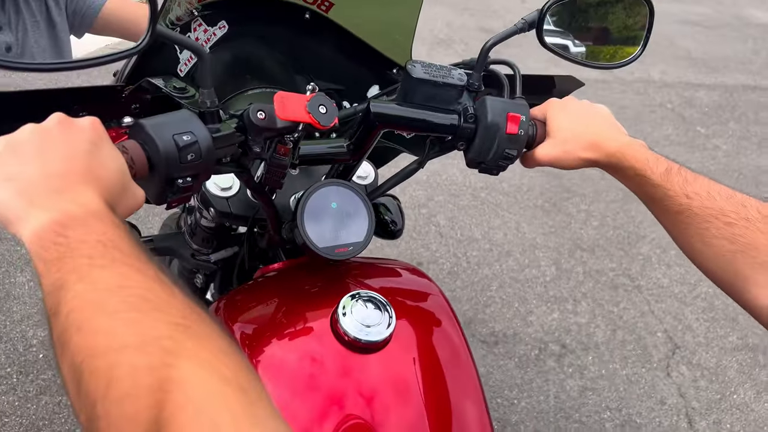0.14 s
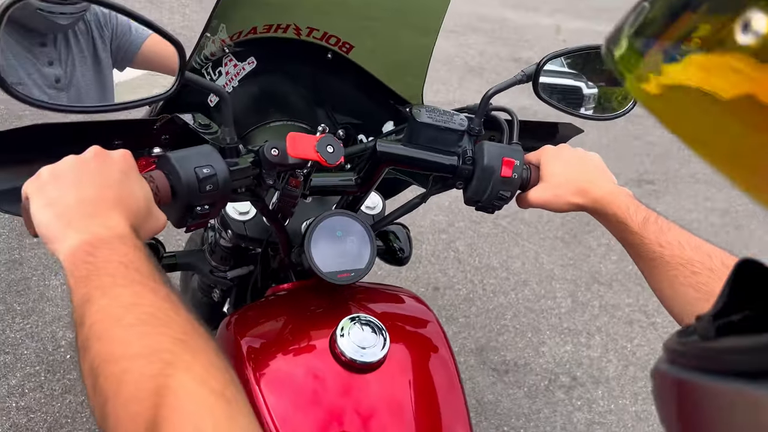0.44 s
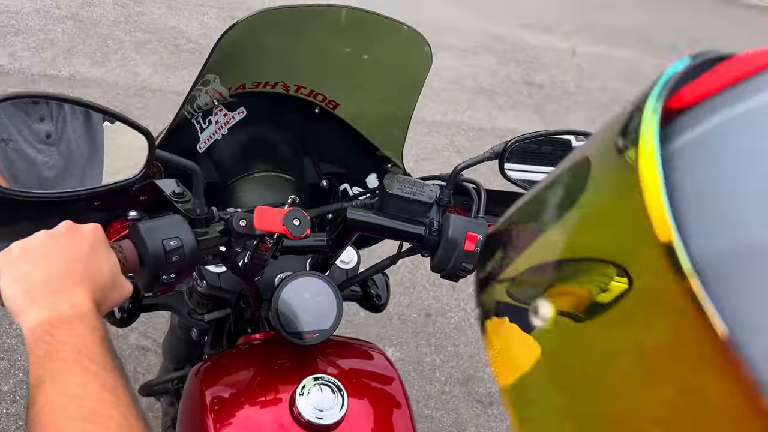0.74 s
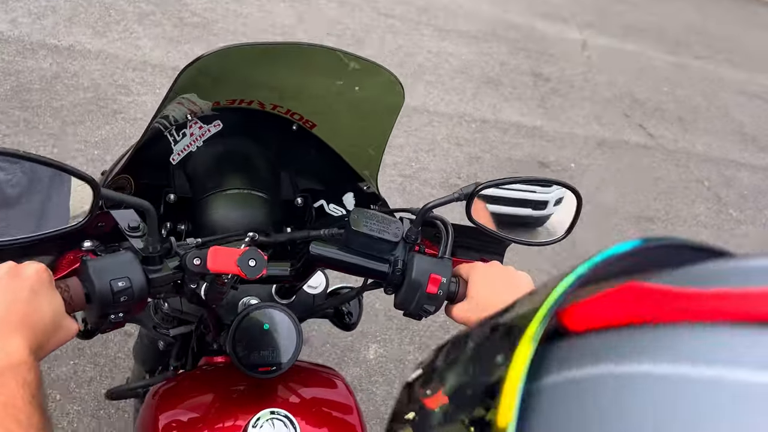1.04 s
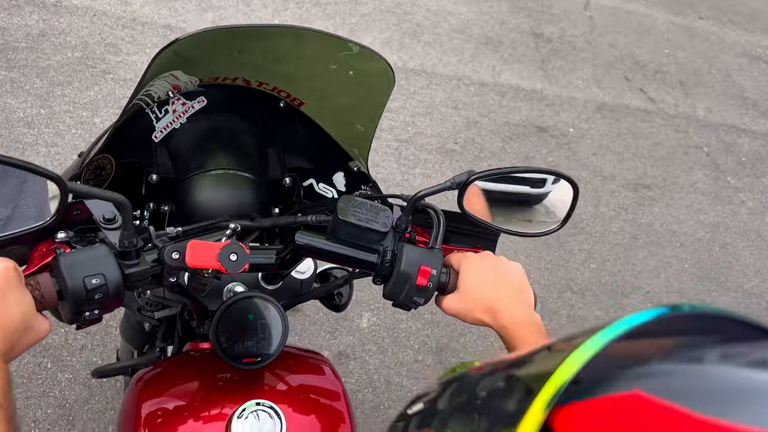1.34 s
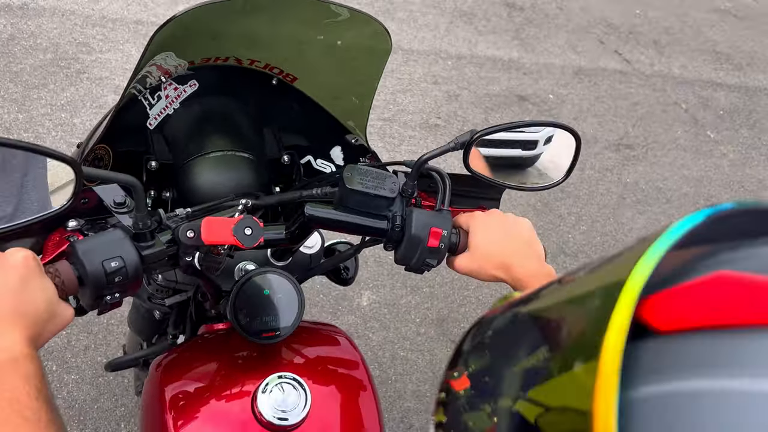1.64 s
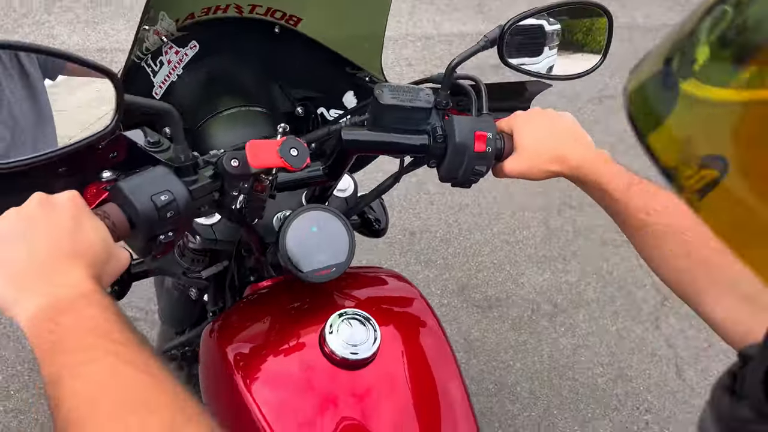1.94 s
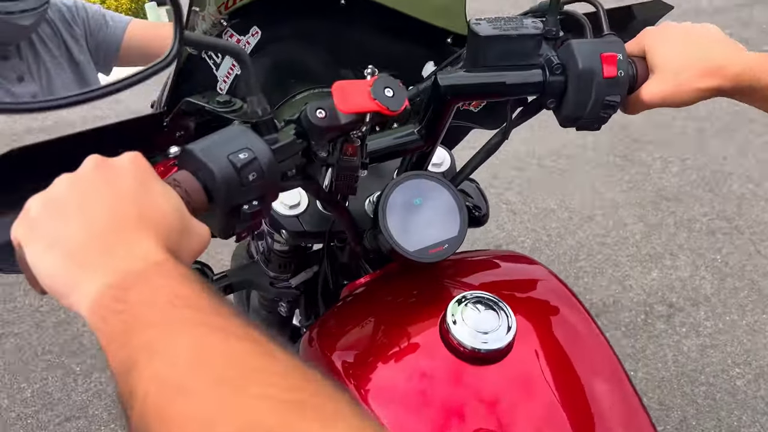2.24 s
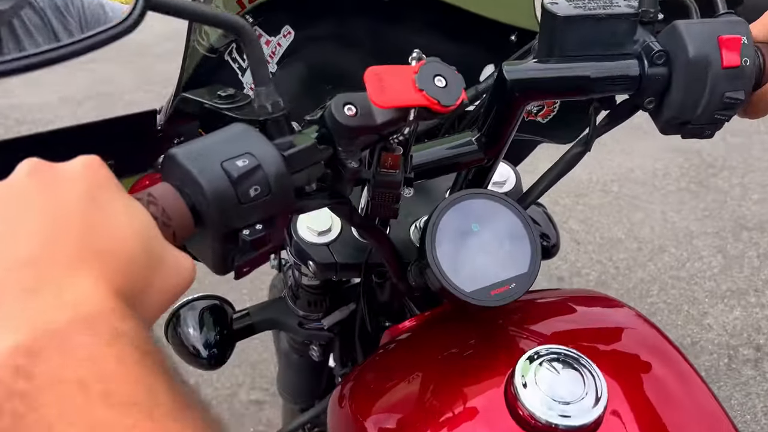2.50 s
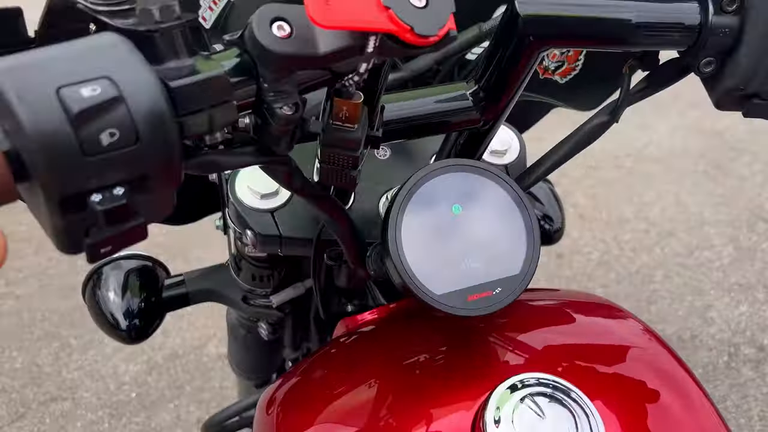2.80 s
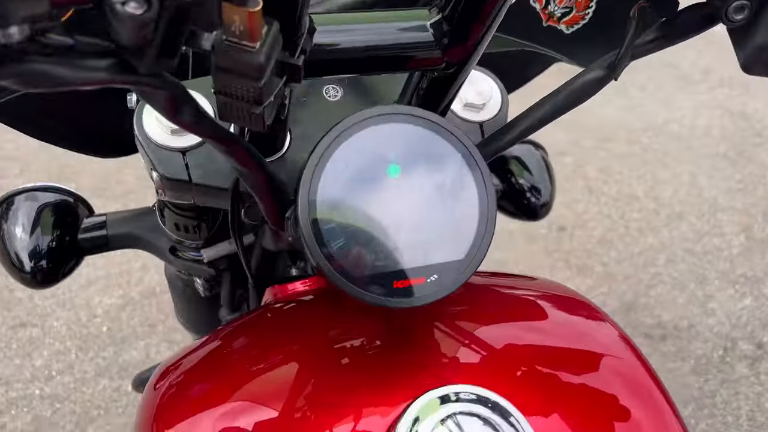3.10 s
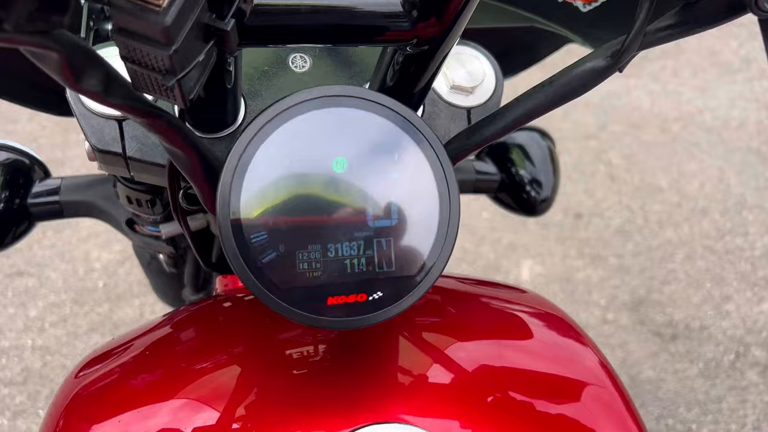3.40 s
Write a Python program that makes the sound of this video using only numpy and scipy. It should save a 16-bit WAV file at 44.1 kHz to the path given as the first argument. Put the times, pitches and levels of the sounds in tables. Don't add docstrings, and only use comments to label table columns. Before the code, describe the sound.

A V-twin motorcycle idles outdoors, about nine lumpy low thumps a second, with fine metallic ticking and hiss. A hand-held phone above the tank moves closer after two seconds, and the clatter grows louder.

```python
import sys
import numpy as np
from scipy import signal
from scipy.io import wavfile

SR = 44100
rng = np.random.default_rng(int(sys.argv[2]) if len(sys.argv) > 2 else 0)


def magnitude_from_level(level_db):
    exponent = np.asarray(level_db, float) / 20
    return 10 ** exponent


def to_wav(s):
    ch = np.atleast_2d(s).T
    pcm = np.round(np.clip(ch, -1, 1) * 32767)
    wavfile.write(sys.argv[1], SR, pcm.astype(np.int16))


N = 156555


# [front fires t/s, level/dB, rear lag t/s, level/dB]
CYCLES = [(-0.1609, 0.1518, 0.037, 0.8357), (-0.0501, 1, 0.046, -1.7), (0.0606, 2.3, 0.047, -6),
          (0.167, 0.9, 0.043, 0.1), (0.2748, 2.2, 0.04, -10), (0.3854, 2.5, 0.0433, 0),
          (0.4954, 1, 0.038, -10), (0.608, 1, 0.0443, -1.8), (0.7185, 1.4912, 0.039, -11),
          (0.8271, 2, 0.042, -0.2), (0.934, 0.8054, 0.035, -13), (1.0419, 1.3, 0.043, -1),
          (1.1487, 0.7, 0.039, -16.1109), (1.2595, 1.5, 0.044, -1.3), (1.3688, 0.9, 0.04, -12),
          (1.4826, -0.1, 0.041, -1.7), (1.5897, 1.7, 0.037, -23), (1.6989, 1.3, 0.042, -1),
          (1.8057, 2, 0.047, -10), (1.9124, 2, 0.044, -0.7), (2.0182, 1.6, 0.0445, -5.5),
          (2.1241, 1.5731, 0.04, -0.5), (2.2288, 2.5, 0.042, -4), (2.3343, 1.3, 0.0406, 2),
          (2.4369, 2.5, 0.04, 1.2), (2.541, 0.409, 0.0305, 4.5), (2.6488, 0.1, 0.0294, 1.2),
          (2.7543, 1.4, 0.0302, -2), (2.8624, 0.1, 0.0311, 2.5), (2.9703, 1.5, 0.0303, -4.7356),
          (3.0784, -0.2, 0.0316, 2), (3.1871, 0.7472, 0.0298, -4.5), (3.2939, 0.5, 0.0311, 2),
          (3.4014, 1.8, 0.0299, -2.5), (3.508, 1.0849, 0.0312, -5)]


def crank():
    front_s, front_db, lag_s, rear_db = np.transpose(CYCLES)
    cycle_s = np.append(np.diff(front_s), 0.1)
    return front_s, cycle_s, front_db, front_s + lag_s, rear_db


# [f/Hz, t60/s, signed strength: front opens, front shuts, rear opens, rear shuts]
PIPE_FAR = [(55.1, 0.45, -0.12, 0.14, -0.23, 0.013), (68.6, 0.49, -0.083, 0.12, 0.82, 0.14),
            (77.6, 0.122, 0.58, -0.4, -0.78, -0.079), (121.1, 0.159, -0.48, -0.31, 0.43, -0.33),
            (147.7, 0.3, -0.19, 0.22, -0.37, -0.099), (168.9, 0.184, 0.469, 0.1, -0.42, -0.121),
            (194.6, 0.037, 0.24, -0.0052, 0.66, 0.16), (283, 0.16, -0.14, 0.057, -0.038, -0.028),
            (311.3, 0.2, 0.059, 0.025, 0.098, -0.12)]
PIPE_NEAR = [(63.7, 0.35, -0.066, 0.11, -0.062, 0.25), (81.2, 0.29, 0.23, -0.037, -0.1, -0.37),
             (114.7, 0.15, -0.12, 0.1, 0.057, -0.39), (128.05, 0.49, -0.37, -0.38, 0.15, 0.27),
             (151.1, 0.23, -0.28, 0.29, 0.21, 0.36), (173.2, 0.17, 0.56, -0.14, -0.58, -0.16),
             (204.162, 0.096, 0.22, 0.16, 0.071, 0.12), (241.5, 0.12, 0.1, 0.13, 0.017, 0.014),
             (296, 0.084, -0.16, 0.015, 0.124, 0.0)]
VALVE_OPEN_S, BLOWDOWN_S, SHUT_S = 0.0219, 0.0028, 0.0035
FIRING_SPREAD_DB = 0.16


def exhaust(modes, front_s, front_db, rear_s, rear_db):
    spread_db = FIRING_SPREAD_DB * rng.standard_normal((len(front_s), 2)).T
    front_amp, rear_amp = magnitude_from_level(np.array([front_db, rear_db]) + spread_db)
    puffs = []
    for fire_s, size in ((front_s, front_amp), (rear_s, rear_amp)):
        puffs.append(puff(clicks(fire_s, size), BLOWDOWN_S))
        puffs.append(puff(clicks(fire_s + VALVE_OPEN_S, size), SHUT_S))
    return sum(ring(np.dot(strengths, puffs), hz, t60_s) for hz, t60_s, *strengths in modes)


# [share of cycle, far level/dB, near level/dB, decay/s]
CONTACTS = [
    (.2, -1.5, 0.5, 0.01),
    (0.55, 2, -15, 0.00757),
    (.6, -6, 2.5, 0.0075),
    (.93, 0.5, -3, 0.011),
    (.78, -2, 0.5, 0.0073),
    (0.022, 0, -2.5, 0.012),
]
# [f/Hz, density/dB per Hz]
CLATTER = [(190, -13), (330, -5.5), (553, -10), (988, -7), (3360, -19.5), (7170, -18), (8290, -27),
           (12600, -20.5), (16200, -25)]
# [f/Hz, width/Hz, far level/dB, near level/dB]
CASING = [(980, 200, 0, 4), (1270, 78, 2, 4), (1765, 110, 2, 4.5), (485, 69, 5.5, 4.5), (626, 70, 6, 0.5),
          (2733, 166, 7.5, 4.5), (3840, 310, 2.5, 3.5), (6060, 220, 2.5, 3.5), (9030, 210, 5.5, 5),
          (10900, 230, 2, 5.5), (12860, 440, 7, 6.5), (14700, 180, -2, 2), (9300, 210, -2.5, 3),
          (813, 47, -0.5, 2.5), (370, 64, 0.5, -11)]
CONTACT_SPREAD_DB, CONTACT_JITTER_S, CONTACT_WIDTH_S = 2, 0.002, 0.0027
RATTLE_PER_S, RATTLE_DB = 1500, -9
COVER_DB, COVER_WANDER_DB = -5, 5
FINS_HZ, FINS_WIDTH_HZ, FINS_DB = 6890, 1540, -17


def valve_gear(front_s, cycle_s, near, fins_db):
    near_then = np.interp(front_s * SR, np.arange(N), near)
    swell = 1
    for share, far_db, near_db, decay_s in CONTACTS:
        jitter, spread = rng.standard_normal((len(front_s), 2)).T
        hit_s = front_s + share * cycle_s + CONTACT_JITTER_S * jitter
        hit_db = far_db + near_then * (near_db - far_db) + CONTACT_SPREAD_DB * spread
        hits = puff(clicks(hit_s, magnitude_from_level(hit_db)), CONTACT_WIDTH_S)
        decaying = signal.lfilter([1], [1, -np.exp(-1 / (decay_s * SR))], hits)
        swell = swell + decaying[SR:SR + N] ** 2

    grains = (rng.random((2, N)) < RATTLE_PER_S / SR) * rng.standard_normal((2, N))
    hiss = rng.standard_normal((2, N))
    white = np.sqrt(swell) * (hiss + magnitude_from_level(RATTLE_DB) * rms_one(grains))
    clatter = banded(white, CLATTER, patchy_db=1.5, rate_hz=2.66)
    for hz, width_hz, far_db, near_db in CASING:
        clatter = peak(clatter, hz, width_hz, far_db + near * (near_db - far_db))
    for hz in np.geomspace(700, 15000, num=44) * rng.uniform(.97, 1.03, size=44):
        added = peak(clatter, hz, .012 * hz, 5.7) - clatter
        clatter = clatter + magnitude_from_level(COVER_DB + COVER_WANDER_DB * drift(7.3)) * added

    fins = bandpass(white[1], FINS_HZ - FINS_WIDTH_HZ / 2, FINS_HZ + FINS_WIDTH_HZ / 2)
    return rms_one(clatter) + magnitude_from_level(FINS_DB + fins_db) * rms_one(fins)


# [t/s, level/dB, f/Hz]
PINGS = [(0.027, -26, 900), (0.08, -25, 912), (0.133, -27, 1220), (0.294, -20.5, 1090), (0.35, -25, 1070),
         (0.43, -16.5, 1297), (0.654, -25, 1270), (0.871, -14, 1312), (0.928, -26, 1240), (1.146, -29, 953),
         (1.324, -24, 840), (1.504, -24, 820), (1.612, -27, 1090), (1.676, -29, 860), (1.799, -27, 1250),
         (1.935, -24, 1360), (2.06, -20.5, 1005), (2.152, -22, 1380), (2.194, -27, 1160),
         (2.255, -23, 1220), (2.458, -27, 1300), (2.563, -19, 816), (2.598, -23, 1010), (2.646, -23, 939),
         (2.729, -24, 960), (2.773, -21, 960), (2.818, -27, 856), (2.883, -24, 1280), (2.953, -21, 950),
         (2.989, -18, 969), (3.04, -26, 966), (3.098, -15, 1260), (3.171, -18.5, 982), (3.207, -19, 980),
         (3.286, -21, 840), (3.321, -23, 969), (3.364, -23, 1000), (3.421, -21, 1000), (3.489, -19, 999),
         (3.52, -16, 1380)]


def knock():
    return sum(ring(puff(clicks([s], magnitude_from_level(db)), 0.00075), hz, t60_s=0.05) for s, db, hz in PINGS)


# [f/Hz, density/dB per Hz]
RUMBLE = [(13, -42), (40, -9), (59, -4), (145, -1), (179, -9.5), (221, -8), (301, -14.5), (362, -31),
          (420, -28), (550, -61.5), (920, -120)]
RUMBLE_DB = -24


def rumble():
    white = rng.standard_normal((2, N))
    return magnitude_from_level(RUMBLE_DB) * banded(white, RUMBLE, patchy_db=3.5, rate_hz=6.8)


def rms_one(x):
    return x / np.sqrt(np.mean(x ** 2) + 1e-20)


def drift(rate_hz):
    r = np.exp(-80 * np.pi * rate_hz / SR)
    white = rng.standard_normal(N // 40 + 2002)
    slow = signal.lfilter([1], [1, -2 * r, r * r], white)[2000:]
    return np.interp(np.arange(N) / 40, np.arange(len(slow)), rms_one(slow))


def clicks(s, sizes):
    out = np.full(N + 2 * SR, 1e-18)
    np.add.at(out, np.round((np.asarray(s) + 1) * SR).astype(int), sizes)
    return out


def puff(x, width_s):
    shape = np.hanning(int(width_s * SR))
    return signal.oaconvolve(x, shape / shape.sum(), "same")


def ring(x, hz, t60_s):
    r, w = magnitude_from_level(-60 / (t60_s * SR)), 2 * np.pi * hz / SR
    poles = [1, -2 * r * np.cos(w), r * r]
    return signal.lfilter([0, np.sin(w)], poles, x[SR // 2:SR + N])[-N:]


def peak(x, hz, width_hz, db):
    r = np.exp(-np.pi * width_hz / SR)
    poles = [1, -2 * r * np.cos(2 * np.pi * hz / SR), r * r]
    resonance = signal.lfilter([(1 - r * r) / 2, 0, (r * r - 1) / 2], poles, x)
    return x + (magnitude_from_level(db) - 1) * resonance


def bandpass(x, low_hz, high_hz):
    return signal.sosfilt(signal.butter(2, [low_hz, high_hz], "band", fs=SR, output="sos"), x)


def banded(white, spectrum, patchy_db, rate_hz):
    hz, db = np.transpose(spectrum)
    edges_hz = np.geomspace(hz[0], hz[-1], int(3 * np.log2(hz[-1] / hz[0])))
    out = 0
    for k, (low, high) in enumerate(zip(edges_hz, edges_hz[1:])):
        band_db = np.interp(np.log(low * high) / 2, np.log(hz), db)
        out = out + bandpass(white[k % 2], low, high) * magnitude_from_level(band_db + patchy_db * drift(rate_hz))
    return rms_one(out)


# [t/s, clatter level/dB, fins level/dB]
PHONE = [(0.0, -31, 5), (0.11, -33, -5), (0.45, -32, 5.5), (0.84, -32.5, 4.5), (0.97, -33, -5),
         (0.98, -34.5, -11), (1.7, -33.5, -5), (1.85, -32.5, 4.5), (2.2, -32, 5.5), (2.3, -31, -2),
         (2.92, -28.5, -8), (3.54, -28.5, -1), (3.55, -27, 0)]
# [start t/s, end t/s]
MOVE_S = [2.23, 2.7]


def phone_place():
    t = np.arange(N) / SR
    s, clatter_db, fins_db = np.transpose(PHONE)
    return np.interp(t, s, clatter_db), np.interp(t, s, fins_db), np.interp(t, MOVE_S, [0, 1])


def scene():
    clatter_db, fins_db, near = phone_place()
    front_s, cycle_s, *firing = crank()
    thump_far = exhaust(PIPE_FAR, front_s, *firing)
    thump_near = exhaust(PIPE_NEAR, front_s, *firing)
    thump = (1 - near) * thump_far + near * thump_near
    clatter = magnitude_from_level(clatter_db + 2.5) * valve_gear(front_s, cycle_s, near, fins_db)
    return (thump + clatter + knock() + rumble())[None]


def low_pass(x):
    return signal.sosfilt(signal.butter(12, 15700, fs=SR, output="sos"), x)


LIMIT = 1.2


def record(dry):
    highpassed = signal.sosfilt(signal.butter(2, 30, "high", fs=SR, output="sos"), dry)
    rounded = LIMIT * np.tanh(highpassed / LIMIT)
    mix = rounded * np.minimum(np.arange(N) / (0.0014 * SR), 1)
    return low_pass(mix)


dry = scene()
out = record(dry)
to_wav(out)
```